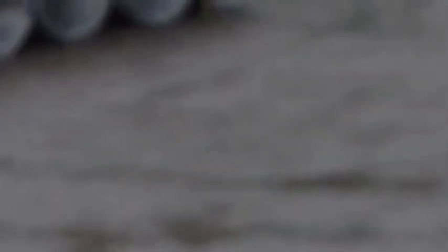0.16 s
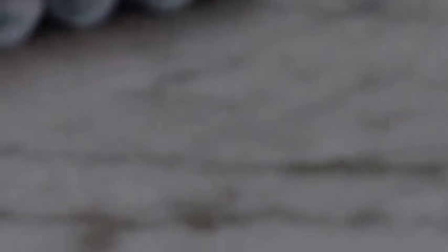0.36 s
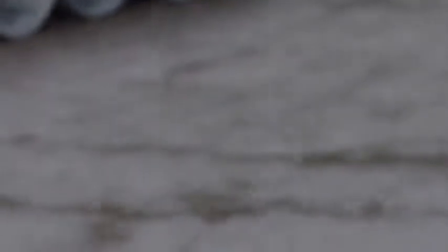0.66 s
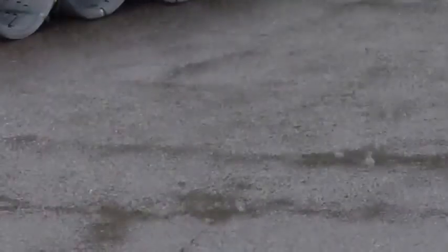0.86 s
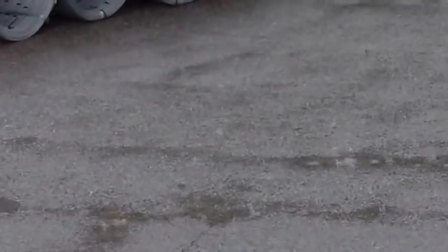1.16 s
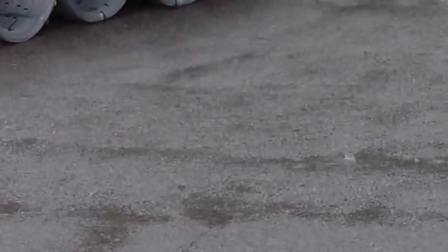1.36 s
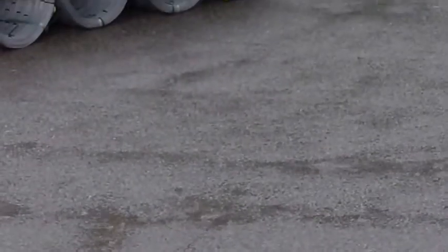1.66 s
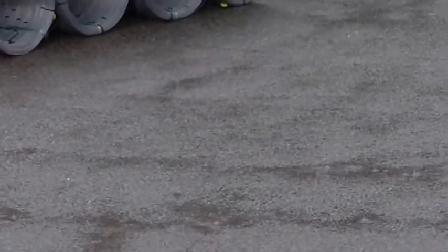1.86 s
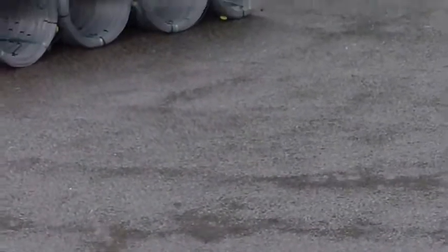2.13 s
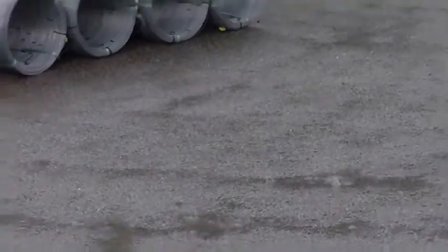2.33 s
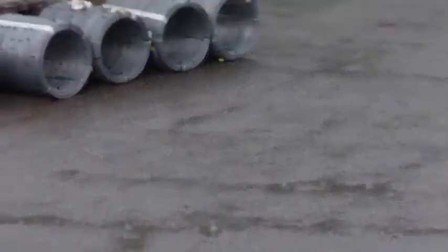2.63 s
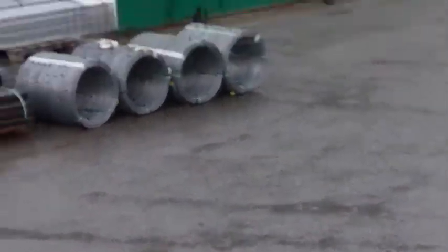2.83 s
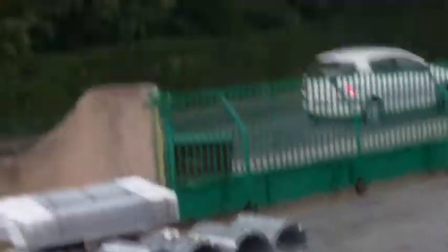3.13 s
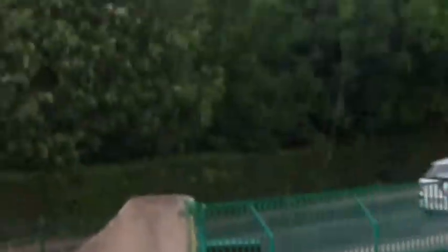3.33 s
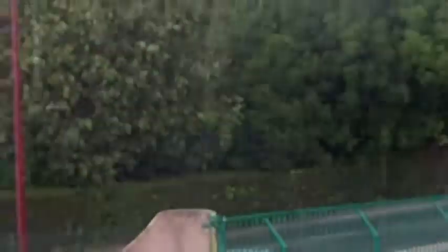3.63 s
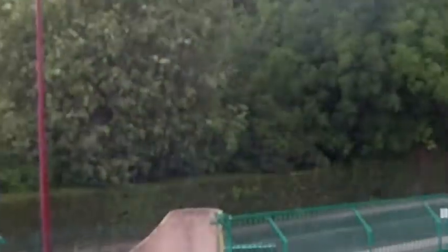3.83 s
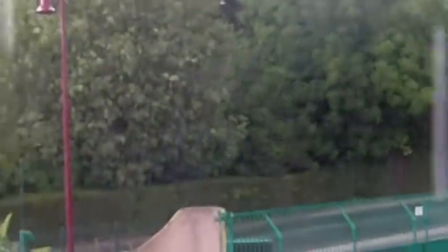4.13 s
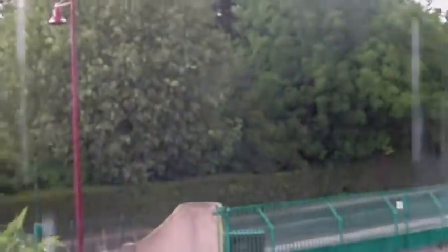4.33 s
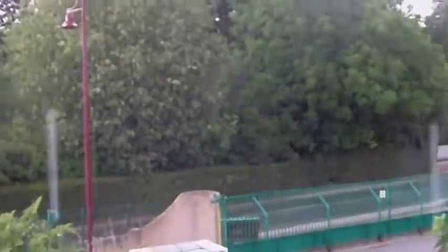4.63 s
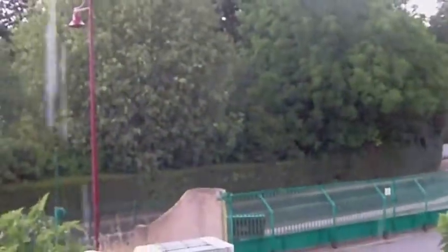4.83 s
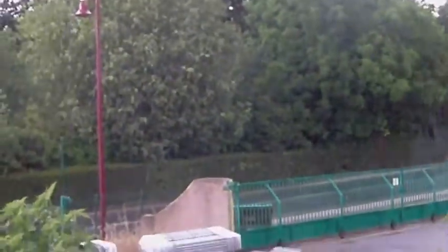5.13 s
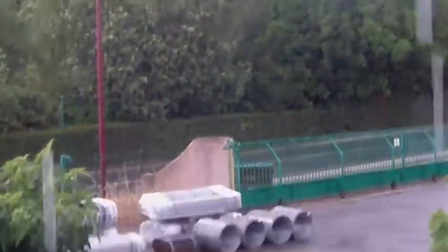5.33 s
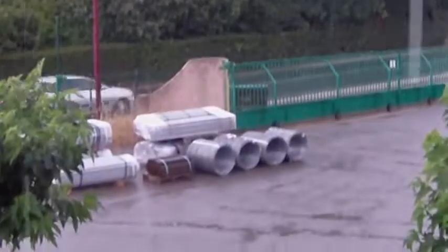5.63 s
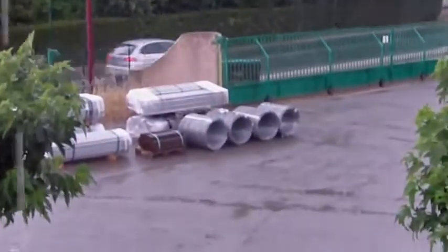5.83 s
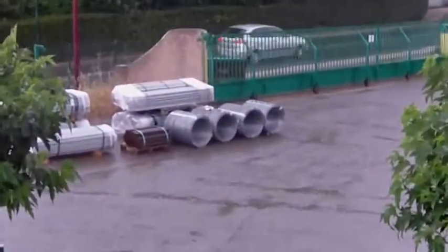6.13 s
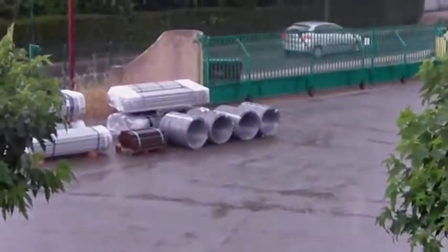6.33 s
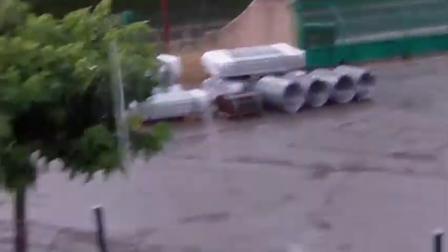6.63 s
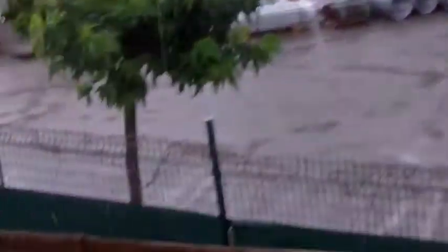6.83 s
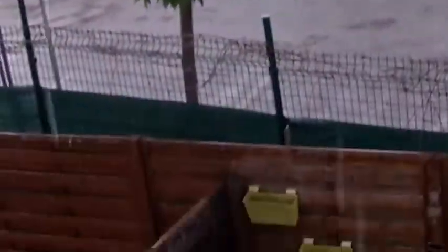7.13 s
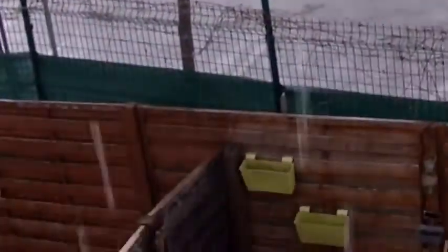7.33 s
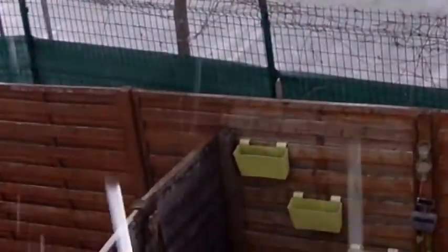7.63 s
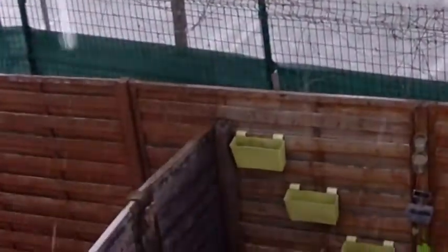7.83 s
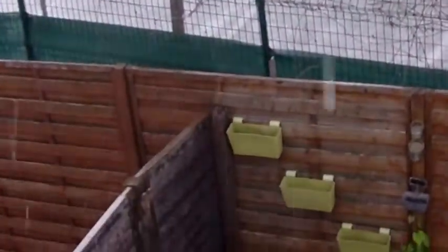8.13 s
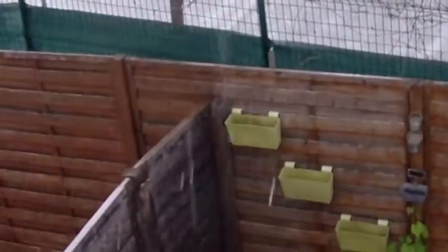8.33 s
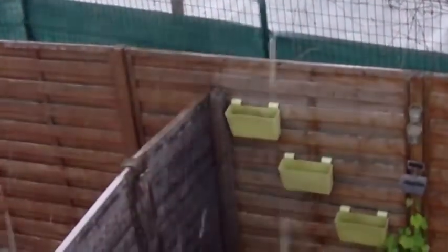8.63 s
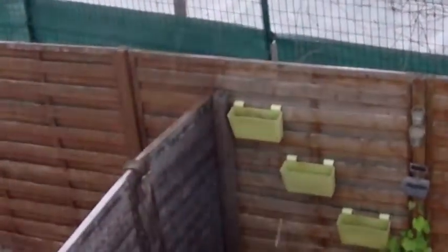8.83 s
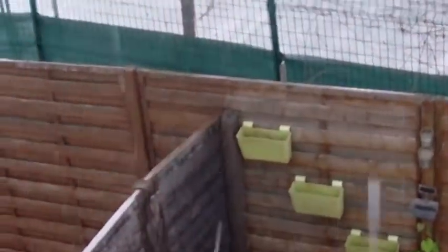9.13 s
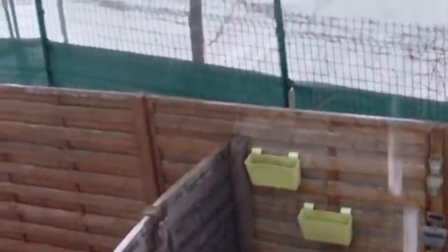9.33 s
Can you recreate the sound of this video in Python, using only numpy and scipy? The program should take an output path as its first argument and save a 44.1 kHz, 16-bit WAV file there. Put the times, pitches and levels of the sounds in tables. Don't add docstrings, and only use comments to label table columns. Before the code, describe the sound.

Continuous heavy rain fills everything, a thick midrange rattle with little bass. Hailstones strike irregularly with tight hollow knocks, and car hum is almost buried far away. The rain swells after three seconds, then gains airy treble near five and a half. A finger thuds the handheld device, and clearer drop plinks continue with the rain until the end.

```python
import sys
import numpy as np
from scipy import signal
from scipy.io import wavfile
from scipy.ndimage import uniform_filter1d, minimum_filter1d

SR = 44100
rng = np.random.default_rng(int(sys.argv[2]) if len(sys.argv) > 2 else 0)


def materialize(psi):
    bounded = np.clip(np.atleast_2d(psi).T, -1, 1)
    quanta = np.round(bounded * 32767).astype(np.int16)
    wavfile.write(sys.argv[1], SR, quanta)


def nominal_scale(level):
    x = np.asarray(level, float) / 20
    return 10 ** x


N = 417627

# t/s, level/dB
DOWNPOUR = [(0.0, -22.5), (0.2, -22.5), (0.5, -21.5), (1.5, -21), (2.95, -21), (3.2, -18), (3.75, -19.5),
            (4.4, -17.5), (4.7, -19), (5.47, -17), (5.62, -20.5), (6.08, -22), (6.25, -18.5), (7.3, -19),
            (7.75, -20.5), (8.05, -19.5), (8.7, -21), (9.47, -21.5)]
# t/s, heading/index (0 yard, 1 hedge, 2 lamp post, 3 trees, 4 past the window frame, 5 street, 6
HEADING = [(0.5, 0.03), (2.9, 0.18), (3.15, 0.95), (3.62, 1.26), (3.8, 1.64), (4.45, 1.94), (4.65, 2.86),
           (5.46, 3.03), (5.58, 4), (5.9, 4.34), (6.2, 4.95), (6.45, 5), (6.6, 5.7), (6.7, 6.14),
           (6.78, 5.2), (6.92, 5.44), (7.05, 6.1), (7.25, 7)]

# low f/Hz, high f/Hz
YARD_BANDS = [(1750, 2400), (1150, 1600), (3400, 4400), (4700, 5500)]
# first band against the downpour level/dB, other bands against the first level/dB
YARD_MIX = [(-7.5, -6, 6.05, -6.5), (-10, -5, 9.2, -5.5), (-8.5, -5.5, 6.1, -2.5), (-10, -5.5, 8.4, 0.5),
            (-8, -4, 5.5, -2), (-8.5, -6, 6.4, -6.5), (-10.5, -5.5, 5.5, -6.5), (-8.5, -5.5, 4.9, -2.5)]
# f/Hz, level/dB per Hz
YARD_COLOUR = [(680, -47), (1150, -13), (1280, -10), (1490, -10), (1570, -9), (2030, -4.5), (2280, -11.5),
               (2580, -11), (2880, -8.5), (3380, -6), (3990, 2), (4220, 0), (4710, -6), (5190, -2.5),
               (6000, -29.5), (7800, -59), (13200, -120)]
# f/Hz, level/dB per Hz
STREET_COLOUR = [(680, -47), (1150, -13), (1460, -7.5), (1740, -6), (1970, -12), (2200, -4), (2310, -10),
                 (2490, -14.5), (2900, -9.5), (3360, -8.5), (3750, -1.5), (3960, -2), (4740, -18.5),
                 (5260, -7), (6000, -21), (7800, -46), (13200, -120)]
# f/Hz, level/dB per Hz
FENCE_COLOUR = [(680, -43), (1150, -12.5), (1270, -17), (1590, -7.5), (1750, -11.5), (1920, -6),
                (2060, -3.5), (2360, -11), (2730, -6), (2820, -9), (3030, -6.5), (3940, 5.5), (4520, -6),
                (5080, -6), (6000, -16), (7800, -47), (13200, -120)]
STREET_SHARE = [0.077, 0.25, 0, 0.098, 0.36, 0.9, 0.66, 0]

# low f/Hz, high f/Hz
SPLASH_BANDS = [(8200, 10500), (5800, 7500), (11000, 15000)]
# first band against the downpour level/dB, other bands against the first level/dB
SPLASH_MIX = [(-28, 3.5, -4), (-31, 6, -3), (-27.5, 6.5, -5), (-27.5, 7.5, -6), (-17, 5, -3.5),
              (-18, 5.5, -3), (-18, -3, -0.7), (-13.5, -5, -7.5)]
# f/Hz, level/dB per Hz
SPLASH_COLOUR = [(3290, -31), (5600, -10.5), (6240, -1.5), (7320, 1.5), (7860, -1), (8400, 0.5),
                 (9520, -3.5), (12800, -23), (15200, -22)]
# f/Hz, level/dB per Hz
SHADED_COLOUR = [(3290, -31), (5600, -7.5), (6500, -10), (7350, -13.5), (8400, -10.5), (10500, -13.5),
                 (11800, -18.5), (12600, -18), (13400, -25), (15200, -29), (18000, -60)]

# low f/Hz, high f/Hz
ROAD_BANDS = [(350, 900), (90, 300), (30, 80)]
# first band level/dB, other bands against the first level/dB
ROAD_MIX = [(-38.5, -22, -50), (-39.5, -22, -50), (-38.3, -25, -48), (-39, -17.5, -54), (-38.5, -23, -46),
            (-39, -19, -59), (-39.5, -20, -55), (-39.5, -23, -50)]
# f/Hz, level/dB per Hz
ROAD_COLOUR = [(18, -75), (30, -46), (75, -54), (98, -41), (297, -20), (423, -5), (539, -1.5), (604, -5.5),
               (697, 0.5), (815, 3), (900, 3), (1170, -16.5), (1980, -120)]

# t/s, peak level/dB, treble share level/dB
HAIL = [(0.5077, -11, -28), (0.8648, -4, -29), (1.4285, -5.5, -47), (1.939, -11, -37), (2.111, -17, -32),
        (2.456, -3, -26), (2.6554, -3.5, -34), (2.901, 0, -38), (2.9472, -9, -33), (3.1845, -4, -31),
        (3.2813, -4, -37), (3.8791, -5, -30), (3.92, -7, -22.5), (4.0776, -9, -36), (4.2941, -10, -33),
        (4.3136, -10, -28), (4.503, -1, -32), (4.559, 2, -37), (4.9626, -2, -35), (5.083, -5, -31),
        (5.1598, -1, -31), (5.2606, -2, -25), (5.659, -7, -20), (5.6776, -3, -22), (7.1693, -5, -23),
        (7.438, -8, -18), (7.5364, -2, -25), (7.7737, -4, -22), (8.302, -5, -33), (9.022, -6, -24)]
# f/Hz, level/dB, t60/s
CAVITY = [(2080, -21, 0.0097), (4025, 3, 0.011)]
# t/s, peak level/dB, plink f/Hz, relative tick level/dB
DRIPS = [(0.8056, -32, 8230, -19), (0.8689, -31, 9030, -18), (0.9742, -26, 9010, -17),
         (2.0009, -32, 8500, -15), (2.0777, -27, 9010, -15), (2.3296, -29, 8540, -18),
         (2.4872, -25, 8520, -16), (3.1398, -30, 9100, -17), (3.1894, -32, 8800, -18),
         (3.6282, -30, 8550, -16), (3.6716, -31, 8620, -21), (3.8854, -30, 10100, -12),
         (4.1854, -21, 9010, -8), (4.5984, -27, 8620, -11), (4.6573, -27, 8450, -25),
         (5.2505, -30, 10200, -12), (5.2654, -27, 8830, -15), (5.5947, -14, 8600, -23),
         (5.673, -15, 9760, -16), (5.742, -13, 9530, -21), (6.2522, -25, 9080, -20),
         (6.5335, -15, 9750, -18), (7.2834, -12, 9070, -18), (7.5338, -18, 8410, -19),
         (7.9394, -16, 9390, -18), (7.9743, -19, 8930, -17), (8.1823, -13, 8640, -20),
         (8.4342, -15, 8275, -18), (9.1032, -15, 8540, -18), (9.2793, -18, 10100, -17)]
# t/s, peak level/dB, f/Hz
BUMP = [
    (6.498, -42, 300),
    (6.577, -24.5, 600),
    (6.5828, -26, 417),
]
# start t/s, end t/s, f/Hz, rms level/dB
ENGINES = [(.1, 1.6, 56, -88), (.6, 1.1, 112, -82), (1.55, 2.35, 107.7, -74), (1.501, 2.4, 161.5, -69),
           (3.45, 4, 102.4, -77), (4.7, 5.85, 278, -63), (4.7, 5.2, 187, -72)]
# f/Hz, width f/Hz
NOTCHES = [
    (1005, 305),
    (7850, 530),
]
# t/s, peak level/dB
SLIPS = [(0.2184, -35), (1.3538, -40), (2.4214, -30), (2.9886, -33), (3.5554, -35), (4.122, -25),
         (4.6894, -30), (5.7574, -31), (7.4604, -29)]


def rain():
    stones = patter(per_s=2500, spread_db=3.15, hiss=0.85)
    yard = coloured(stones, yard_shape, pouring(YARD_MIX), YARD_BANDS, patchy_db=0.84, flicker_db=0.6)

    near = evened(patter(per_s=1200, spread_db=5.4, hiss=0.84) + 0.7 * stones)
    splash = coloured(near, splash_shape, pouring(SPLASH_MIX), SPLASH_BANDS, patchy_db=0.9, flicker_db=0.82)

    drumming = patter(per_s=1500, spread_db=3.1, hiss=0.89)
    road = coloured(drumming, road_shape, droning, ROAD_BANDS, patchy_db=1.14, flicker_db=0.44, size=2048)
    return yard + splash + road


def patter(per_s, spread_db, hiss):
    where, sign = rng.random(N), rng.random(N) - 0.5
    size, far = rng.exponential(1, N), rng.standard_normal(N)
    hits = (where < per_s / SR) * np.sign(sign) * nominal_scale(spread_db * np.minimum(size, 3.6))
    return np.sqrt(hiss) * far + np.sqrt(1 - hiss) * evened(hits)


def coloured(drive, shape_of, levels, bands, patchy_db, flicker_db, size=512):
    overlap = size - size // 4
    hz, t, z = signal.stft(drive, SR, nperseg=size, noverlap=overlap)
    shape = shape_of(hz[:, None], t) + 0 * t

    lead, *others = levels(t)
    wanted = np.array([lead + c for c in [0, *others]])
    power = nominal_scale(2 * shape)
    found = np.array([10 * np.log10(power[(hz > a) & (hz < b)].sum(0) / len(hz)) for a, b in bands])

    rank = np.argsort([a for a, b in bands])
    middle = np.log(np.sqrt(np.prod(bands, axis=1)))[rank]
    blend = np.array([np.interp(np.log(hz + 1), middle, row) for row in np.eye(len(bands))])
    correction = blend.T @ (wanted - found)[rank]

    chance = rng.standard_normal((len(t), len(hz) + 1))
    drift = uniform_filter1d(chance[:, 1:], size=30, axis=0)
    patches = evened(uniform_filter1d(drift, size=2, axis=1)).T
    flicker = evened(uniform_filter1d(chance[:, 0], size=8))
    field = shape + correction + patchy_db * patches + flicker_db * flicker
    return signal.istft(z * nominal_scale(field), SR, nperseg=size, noverlap=overlap)[1][:N]


def yard_shape(hz, t):
    street = np.clip(facing(STREET_SHARE, t)[0], 0, 1)
    last = len(STREET_SHARE) - 1
    fence = facing(np.arange(last + 1) == last, t)[0]
    yard_db, street_db, fence_db = [spectrum(c, hz, skirt_db=43) for c in (YARD_COLOUR, STREET_COLOUR, FENCE_COLOUR)]
    return (1 - street - fence) * yard_db + street * street_db + fence * fence_db


def splash_shape(hz, t):
    opened = np.clip(np.interp(t, *np.transpose(HEADING)) - 3, 0, 1)
    shaded = spectrum(SHADED_COLOUR, hz, skirt_db=46)
    return (1 - opened) * shaded + opened * spectrum(SPLASH_COLOUR, hz, skirt_db=30)


def road_shape(hz, t):
    return spectrum(ROAD_COLOUR, hz, skirt_db=30)


def spectrum(colour, hz, skirt_db):
    octave = np.log2(hz + 1)
    knots, db = np.transpose(colour[1:-1])
    below = np.maximum(np.log2(knots[0]) - octave, 0)
    above = np.maximum(octave - np.log2(knots[-1]), 0)
    return np.interp(octave, np.log2(knots), db) - skirt_db * (below + above)


def pouring(mix):
    def levels(t):
        lead, *others = facing(mix, t)
        return np.interp(t, *np.transpose(DOWNPOUR)) + lead, *others
    return levels


def droning(t):
    swell = np.interp(t, *np.transpose(DOWNPOUR))
    lead, *others = facing(ROAD_MIX, t)
    return lead + 0.17 * (swell - swell.mean()), *others


def facing(table, t):
    heading = np.interp(t, *np.transpose(HEADING))
    columns = np.reshape(table, (len(table), -1)).T
    return np.array([np.interp(heading, np.arange(len(table)), c) for c in columns])


def hail():
    out, t = np.zeros(N), np.arange(1500) / SR
    band = signal.butter(2, [5500 / (SR / 2), 11000 / (SR / 2)], "band")
    fade = nominal_scale(-60 * t / 0.13) * np.minimum(t / 0.004, 1) * (1 - t / t[-1])
    knock = sum(nominal_scale(mode_db) * ring(hz, t60, rise_s=0.00044) for hz, mode_db, t60 in CAVITY)
    for s, db, treble_db in HAIL:
        spray = signal.lfilter(*band, rng.standard_normal(len(t)))
        add(out, s, nominal_scale(db - 9.5) * knock)
        add(out, s, nominal_scale(db + treble_db + 2) * spray * fade)
    return out


def drips():
    out = np.zeros(N)
    for s, db, hz, tick_db in DRIPS:
        add(out, s + 0.00084, nominal_scale(db + tick_db + 8.5) * ring(12000, t60=0.0012, rise_s=0.00005))
        add(out, s + 0.0014, nominal_scale(db - 2) * ring(hz, t60=0.004, rise_s=0.0002))
    return out


def bump():
    out = np.zeros(N)
    for s, db, hz in BUMP:
        add(out, s, nominal_scale(db) * ring(hz, t60=0.014, rise_s=0.0011))
    return signal.lfilter(*signal.butter(2, 90 / (SR / 2), "high"), out)


def engines():
    out = np.zeros(N)
    for start, end, hz, db in ENGINES:
        t = np.arange(0, end - start, 1 / SR)
        knots = np.arange(0, 2, 0.07)
        waver, throb = (np.interp(t, knots, c) for c in rng.standard_normal((2, len(knots))))
        level = nominal_scale(db + 4.6 * np.clip(throb, -3, 1))
        tone = np.sin(2 * np.pi * hz * t + 1.2 * waver) * level
        add(out, start, np.sqrt(2) * tone * signal.windows.tukey(len(t), 0.4))
    return out


def ring(hz, t60, rise_s):
    t = np.arange(int(0.08 * SR)) / SR
    wave = np.sin(2 * np.pi * hz * t) * nominal_scale(-60 * t / t60) * (1 - np.exp(-t / rise_s))
    return wave / abs(wave).max()


def evened(x):
    return x / np.sqrt(np.mean(x ** 2) + 1e-20)


def add(mix, s, sound):
    part = mix[round(s * SR):][:len(sound)]
    part += sound[:len(part)]


def scene():
    return (rain() + hail() + drips() + bump() + engines())[None]


def limited(x, ceiling_db):
    room = np.minimum(nominal_scale(ceiling_db) / (abs(x) + 1e-9), 1)
    return x * uniform_filter1d(minimum_filter1d(room, size=61), size=61)


def low_pass(x):
    return signal.sosfilt(signal.butter(12, 15670, fs=SR, output="sos"), x)


def record(dry):
    x = signal.lfilter(*signal.butter(2, 48 / (SR / 2), "high"), limited(dry, ceiling_db=-5))
    for hz, width_hz in NOTCHES:
        x = signal.lfilter(*signal.iirnotch(hz, hz / width_hz, SR), x)
    band_limit = signal.firwin(301, 15300, window=("kaiser", 7), fs=SR)
    x = signal.oaconvolve(x, band_limit[None], "same")
    for s, db in SLIPS:
        add(x[0], s + 0.0017, nominal_scale(db + 12) * np.array([1, -0.7]))
    return low_pass(x)


dry = scene()
out = record(dry)
materialize(out)
```